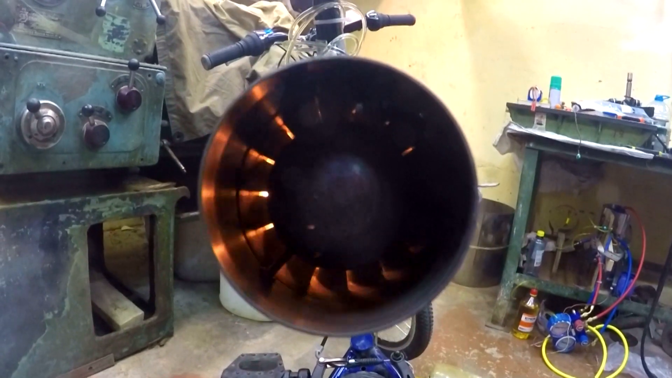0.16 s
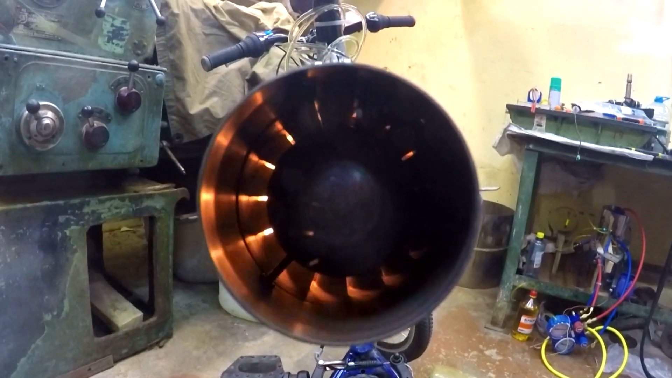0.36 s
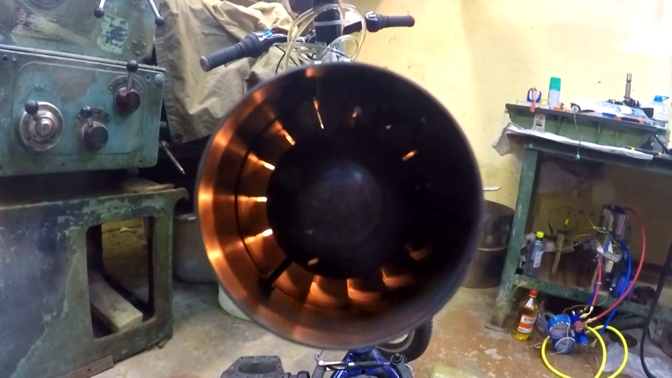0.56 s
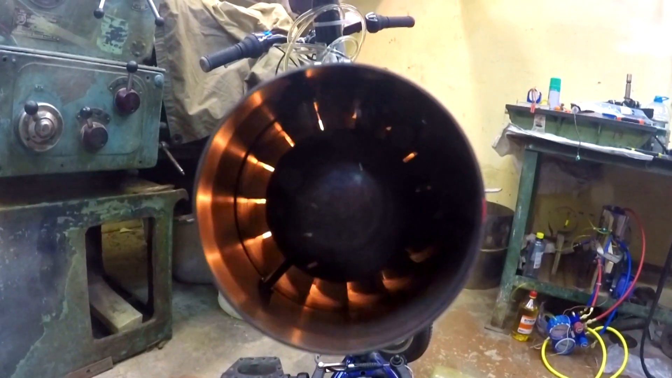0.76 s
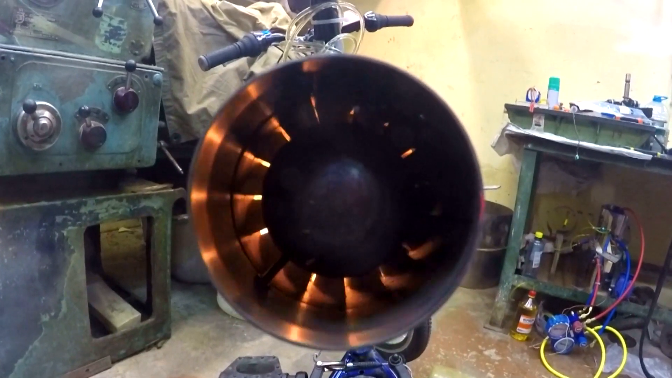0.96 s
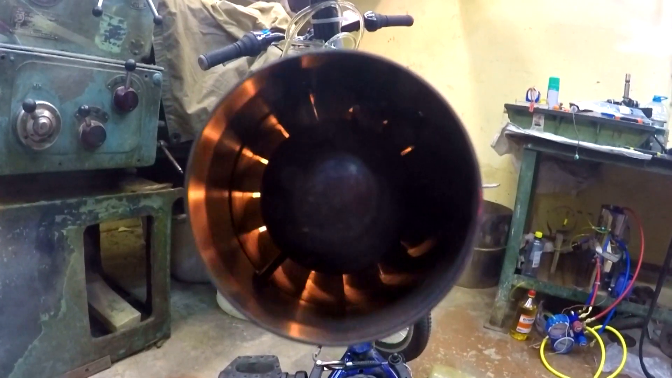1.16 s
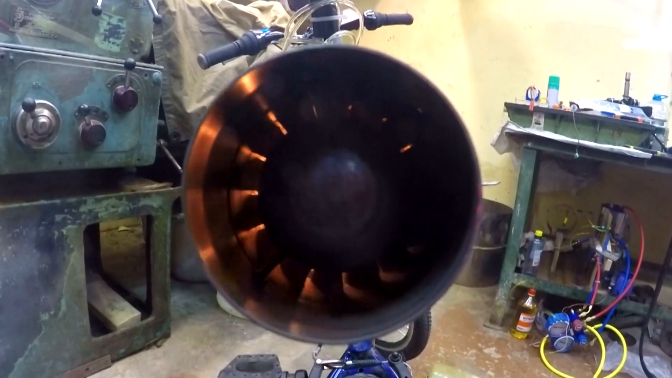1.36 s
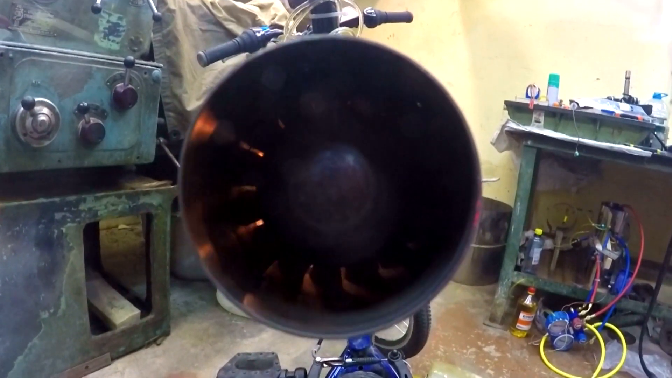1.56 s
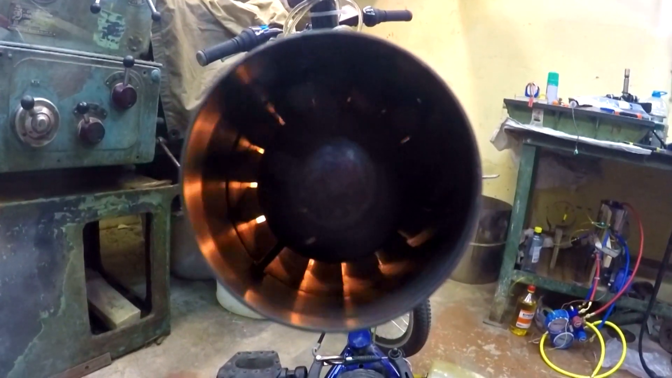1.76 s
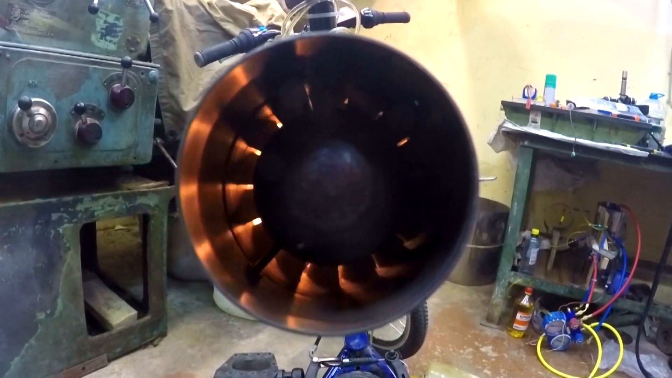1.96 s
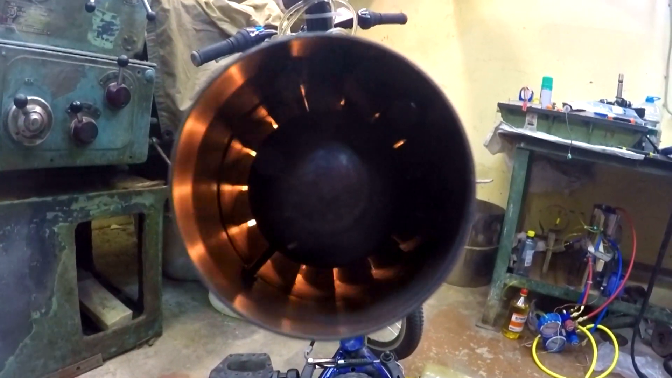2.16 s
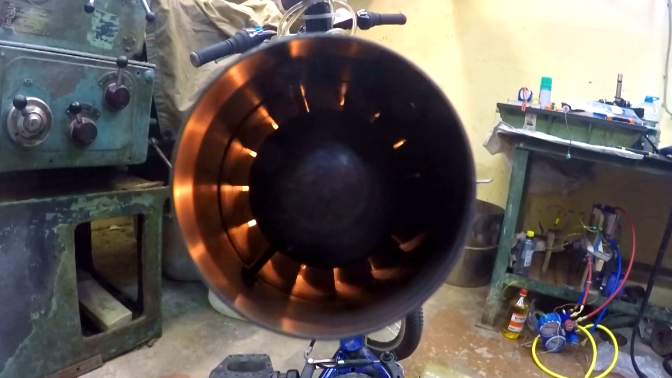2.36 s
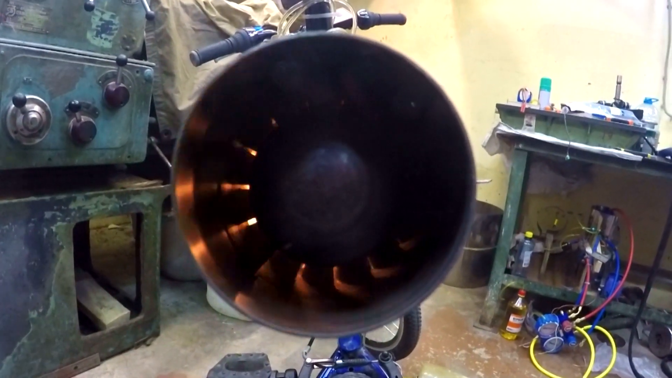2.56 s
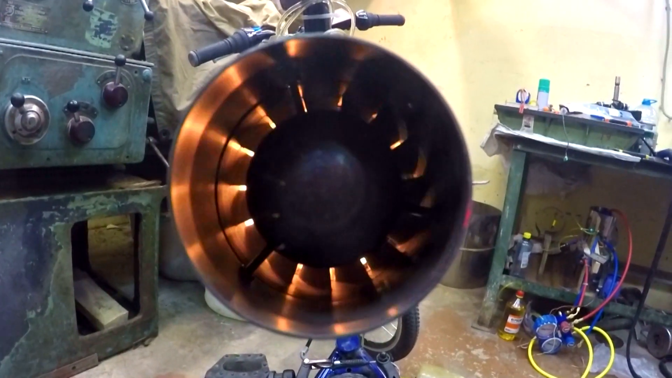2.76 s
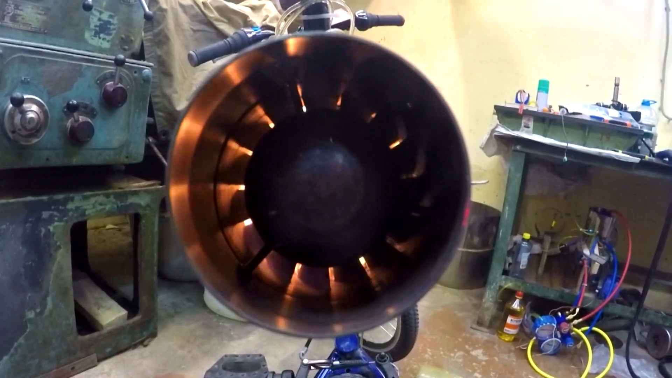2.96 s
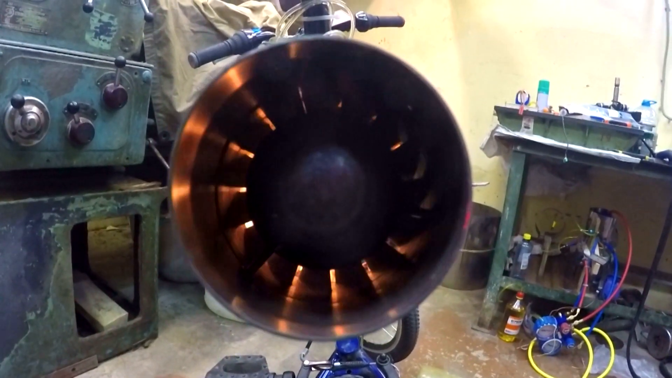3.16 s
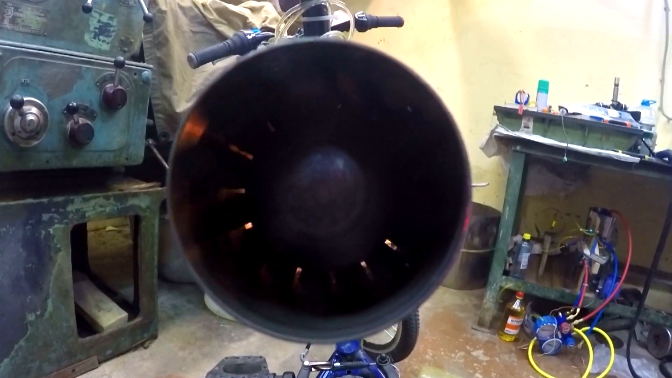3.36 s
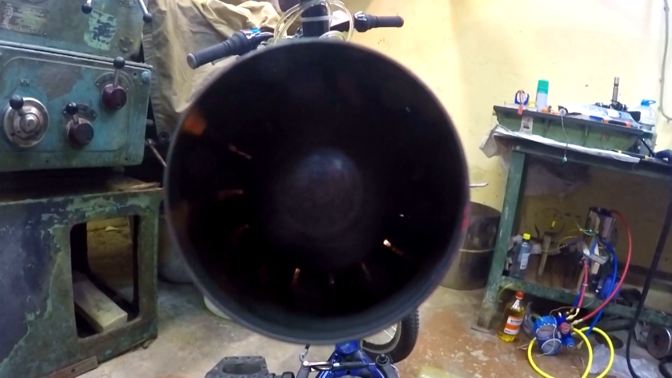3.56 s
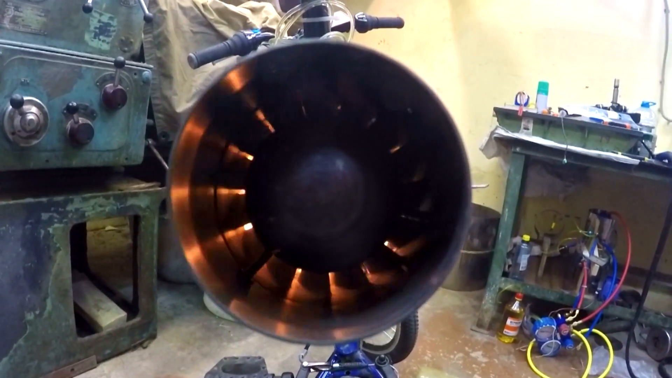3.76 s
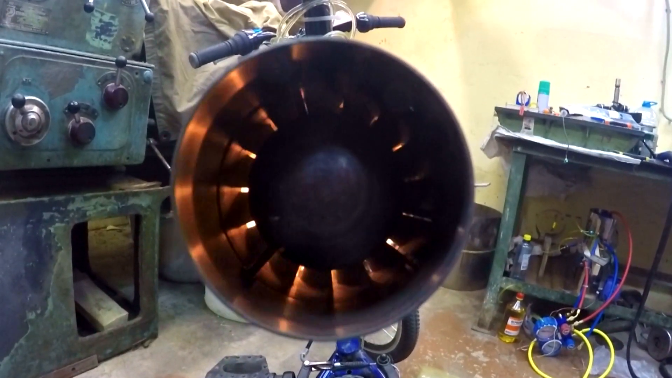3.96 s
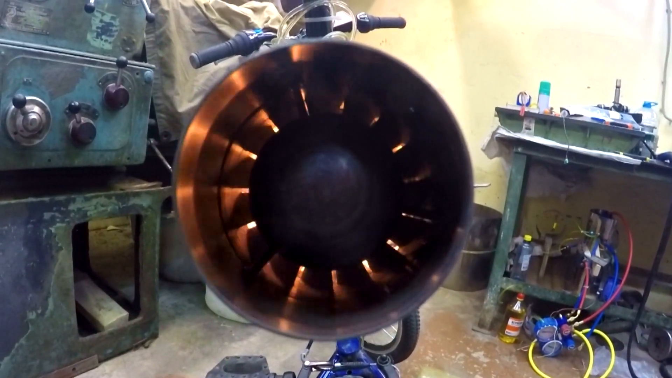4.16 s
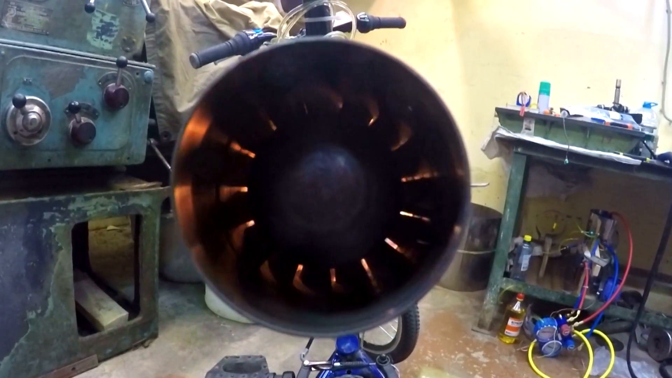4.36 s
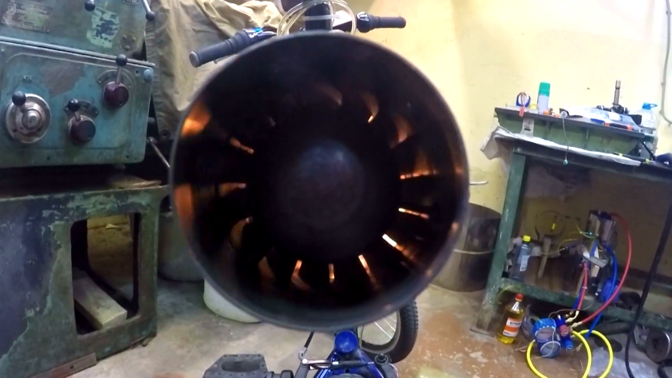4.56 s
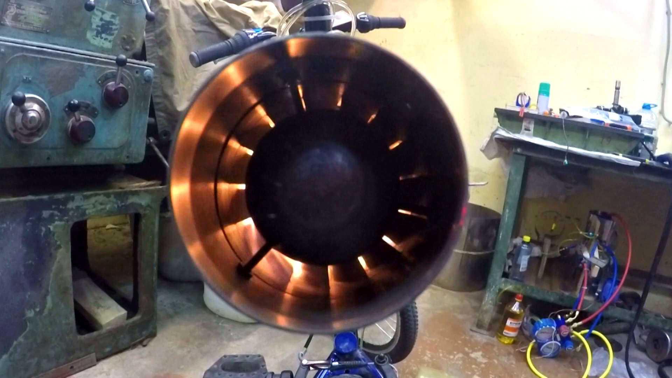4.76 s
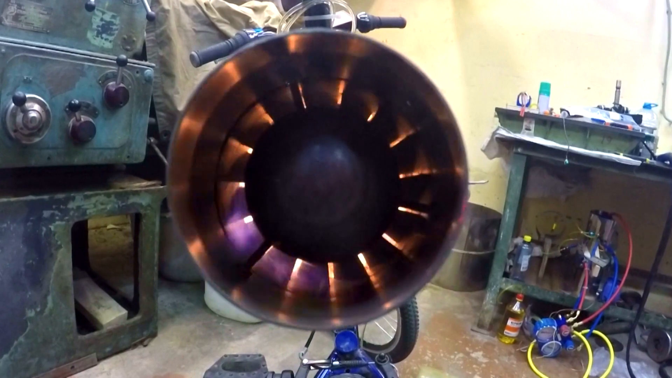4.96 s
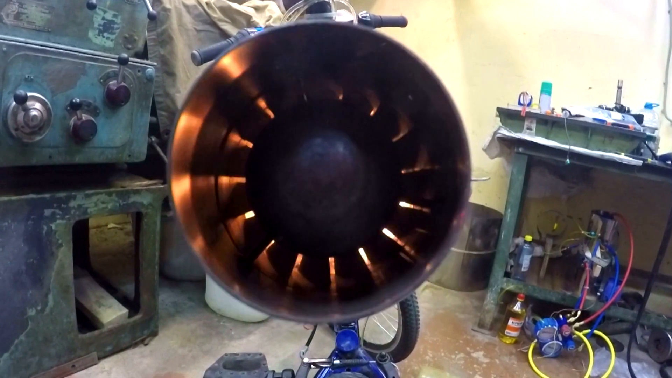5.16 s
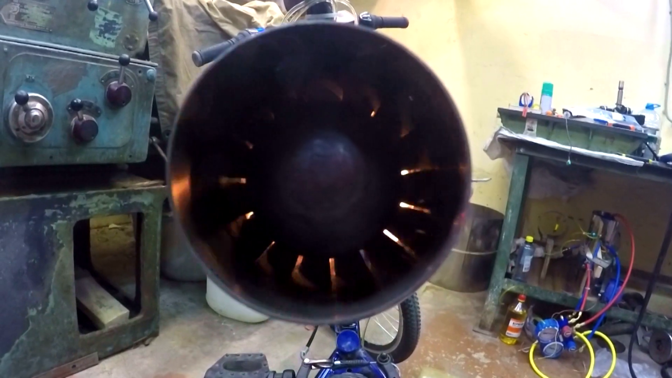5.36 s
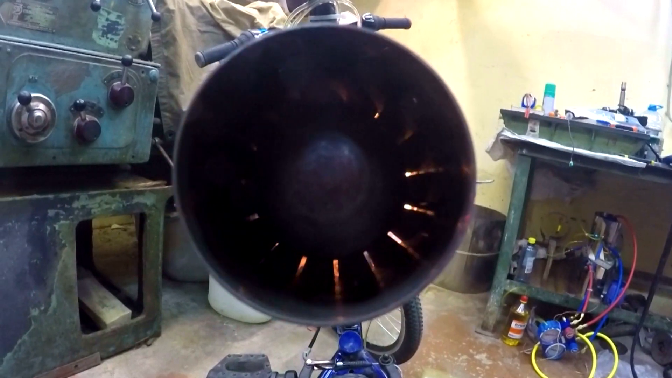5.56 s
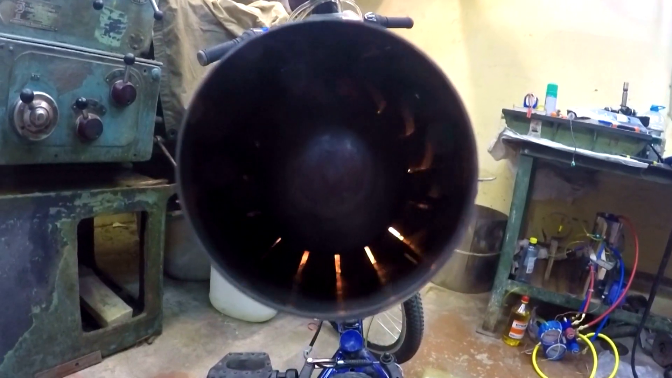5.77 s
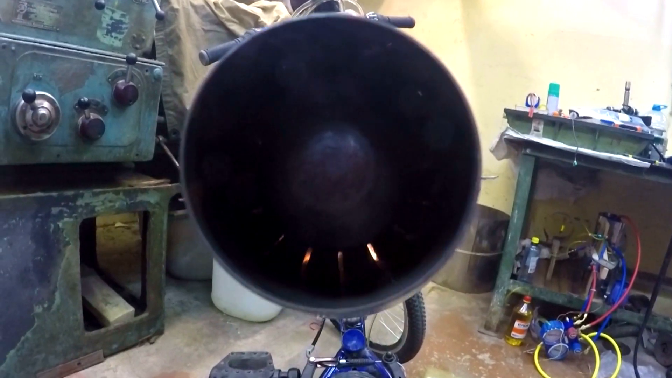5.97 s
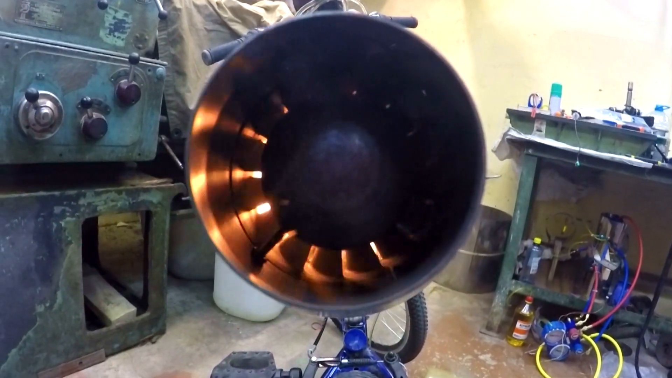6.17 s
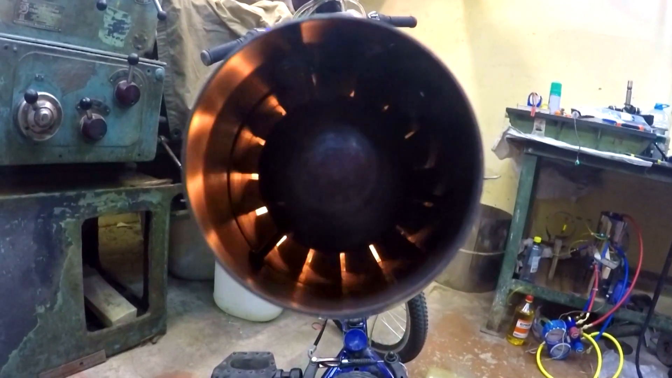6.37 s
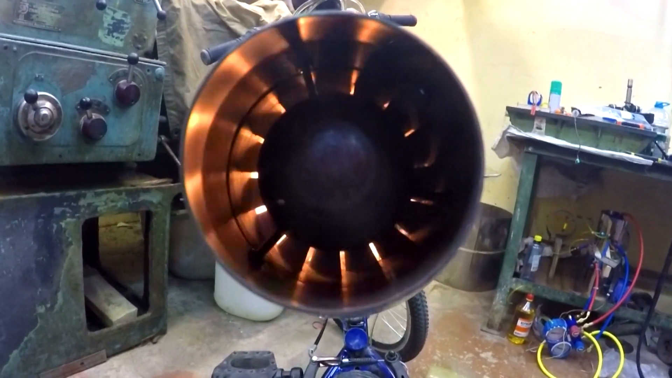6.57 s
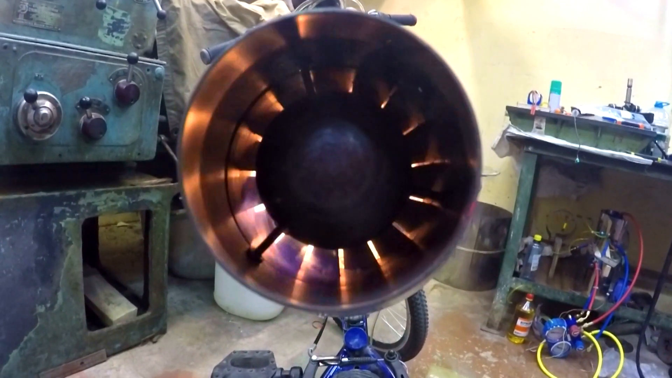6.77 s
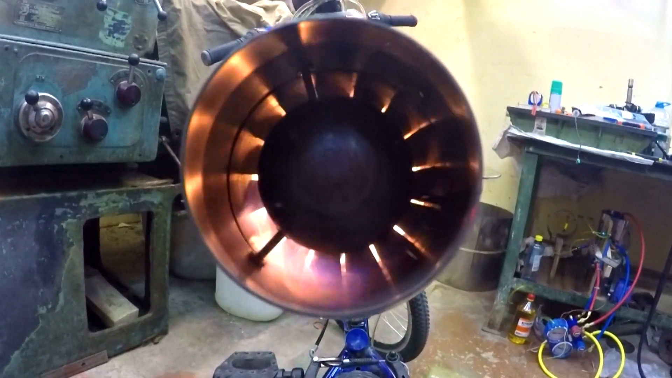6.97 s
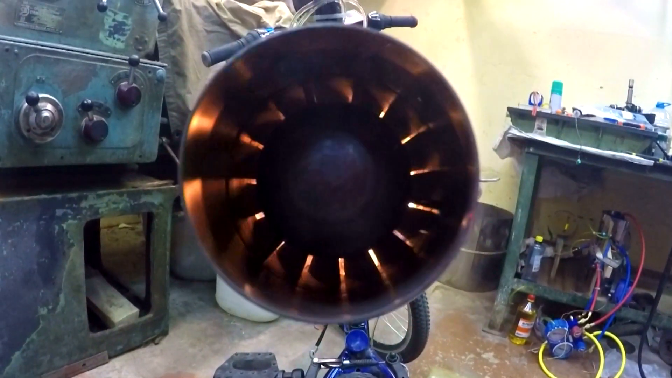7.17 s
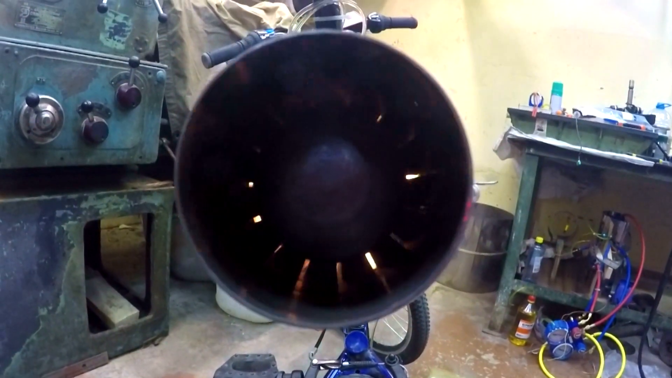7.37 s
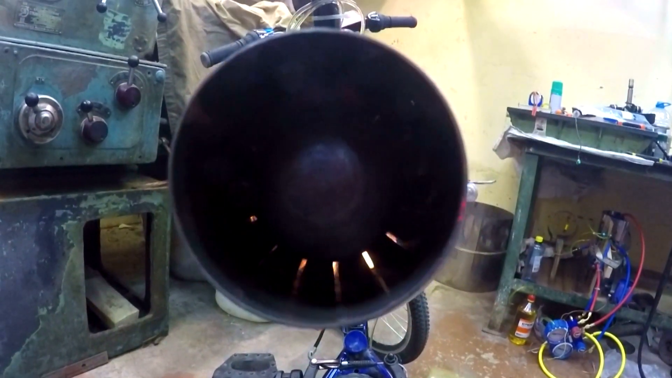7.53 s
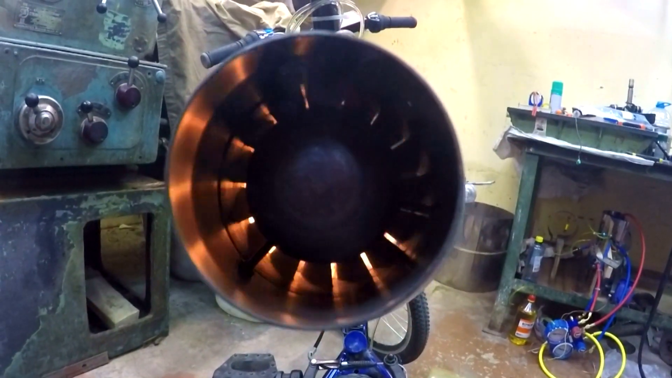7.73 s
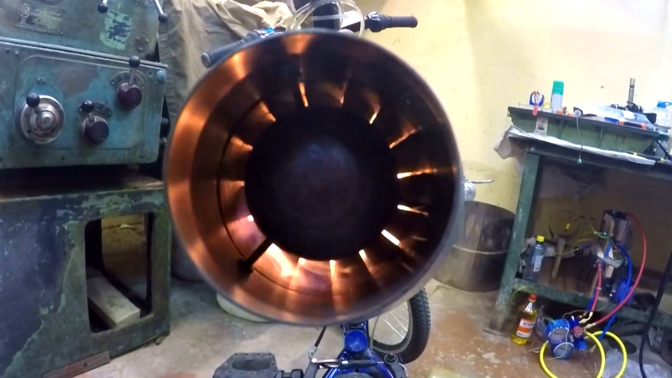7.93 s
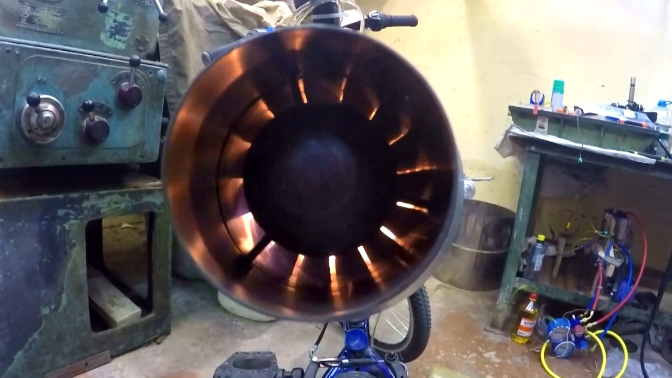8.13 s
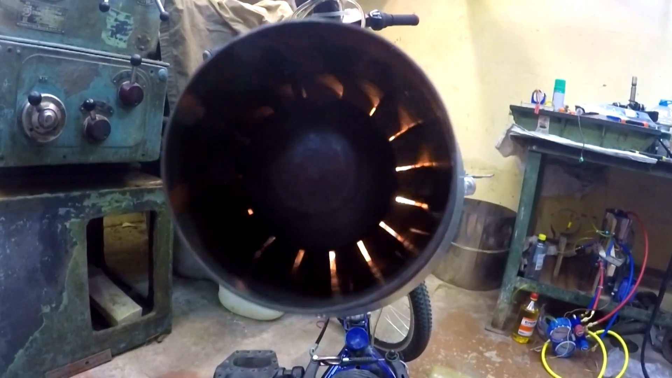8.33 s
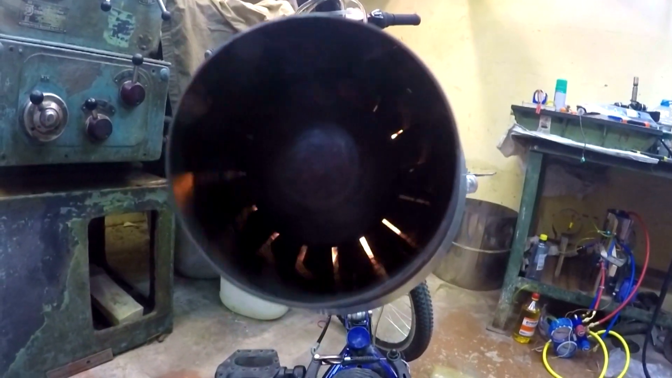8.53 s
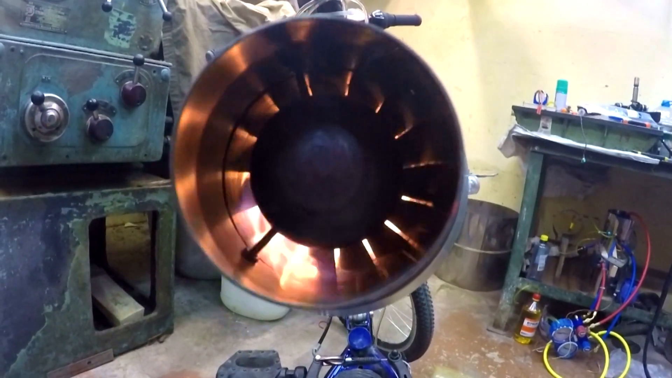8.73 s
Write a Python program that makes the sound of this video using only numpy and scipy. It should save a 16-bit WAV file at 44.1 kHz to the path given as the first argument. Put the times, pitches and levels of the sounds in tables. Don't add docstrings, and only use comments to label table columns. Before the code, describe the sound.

Low, fluttering combustion roar swells and drops in a tail pipe while a faint turbine whine rises and a fuel pump ticks steadily.

```python
import sys
import numpy as np
from scipy import signal
from scipy.fft import rfft, irfft, next_fast_len
from scipy.io import wavfile
from scipy.ndimage import uniform_filter1d, map_coordinates

SR = 44100
rng = np.random.default_rng(int(sys.argv[2]) if len(sys.argv) > 2 else 0)


def master_out(mix):
    frames = np.transpose(np.atleast_2d(mix))
    ceiling = np.clip(frames, -1, 1)
    pcm = np.round(ceiling * 32767).astype(np.int16)
    wavfile.write(sys.argv[1], SR, pcm)


def volts_from_db(level):
    exponent = np.asarray(level, float) / 20
    return 10 ** exponent


N = 388080

# f/Hz, width/Hz, level/dB
ROOM_MODES = [(81, 16, 2), (133, 58, -5.5), (176, 15, 5), (265, 13.5, 5), (283, 12, -2), (524, 8.4, -12),
              (739.4, 15, -22), (1008, 18, 8.5), (1180, 24, -17), (1530, 11, 8), (2300, 95, 5),
              (3770, 530, 2.5), (4960, 110, 7.5)]
# f/Hz, t/s
ECHO_TIME = [(200, 0.25), (2000, 0.97), (10000, 0.18)]

# t/s, f/Hz, level/dB
STARTER_TONE = [(0, 3775, -63), (.5, 3750, -56), (1, 3840, -80.5), (1.3, 3730, -64), (2.4, 3860, -67),
                (3.2, 3830, -88), (8.8, 3930, -94.5)]

FIRM_STROKES = [0, 1, 2, 3, 4, 7, 8, 9, 11, 16, 17, 20, 24, 27, 28, 29, 30, 34]
PUMP_START, PUMP_PERIOD = .135, .2212
FIRM_DB, SOFT_DB = 1, -4
# f/Hz, level/dB
PUMP_COLOUR = [(1200, -30), (2000, -1), (3300, 1), (5000, -6), (7500, -4), (10000, -8), (12000, -17),
               (15000, -26)]

# f/Hz, level/dB
HISS_COLOUR = [(1200, -19), (1700, -19), (2340, -5), (3060, -7.5), (3900, -5.5), (4420, -14), (5050, -9),
               (5680, -13), (7880, -20), (8770, -19.5), (10500, -24.5), (12100, -26.5), (14800, -27.5),
               (15400, -33)]
# f/Hz, level/dB
INTAKE_COLOUR = [(600, -23), (800, 8), (1050, 9.5), (1350, 10), (1500, 0.5), (1650, -38)]

# t/s, speed/(rev/s)
SHAFT_SPEED = [(0, 58.15), (.31, 60.85), (.63, 63.55), (.94, 65.84), (1.26, 67.84), (1.57, 69.45),
               (2.2, 72.23), (3.14, 75.99), (3.77, 77.07), (4.71, 79.49), (5.34, 81.65), (5.7, 82.1),
               (6.29, 81.79), (6.6, 82.37), (7.23, 85.04), (7.86, 84.75), (8.3, 85.85), (8.8, 85.55)]
BLADES = 60
# t/s, level/dB
BLADE_LEVEL = [(0, -47.5), (.5, -54), (1, -51), (1.4, -49.5), (2.2, -57), (2.7, -51), (3.3, -54.5),
               (3.85, -51), (4.4, -52.5), (4.85, -52.5), (5.3, -54), (5.6, -47.5), (6.2, -49),
               (6.65, -48.5), (6.8, -51.5), (7.15, -47.5), (7.8, -42), (7.9, -50), (8.6, -50.5), (8.8, -57)]
# t/s, half width/s
BLADE_DIPS = [(.13, .012), (.25, .015), (.31, .025), (.44, .015), (.56, .02), (.78, .015), (1.16, .03),
              (1.25, .04), (1.44, .04), (1.85, .05), (2.07, .03), (2.57, .04), (2.81, .03), (2.96, .04),
              (3.75, .05), (4.14, .04), (4.35, .04), (4.62, .05), (4.71, .03), (5.04, .06), (5.16, .04),
              (5.73, .12), (6.51, .03), (6.74, .03), (6.91, .025), (7.0, .05), (8.17, .05), (8.33, .03),
              (8.48, .06), (8.71, .05)]
ROW_ORDERS = [30, 46, 47, 48, 72, 90]
# t/s, half width/s, level/dB
ROW_SWELLS = [
    [(.95, .4, -61), (1.82, 0.1, -65), (3, 0.2, -56.5), (3.61, 0.21, -52.5), (4.54, 0.18, -59),
     (6.05, 0.48, -53.5), (7.6, .25, -57.5), (8.37, .2, -64)],
    [(1.63, 0.3, -67), (2.67, .2, -66), (4.5, 0.41, -59), (5.5, 0.18, -56), (6.75, 0.44, -60.5),
     (8.05, 0.31, -55.5), (8.79, 0.11, -53.5)],
    [(4.25, 0.34, -62), (5.3, .4, -60), (6.45, 0.24, -55), (8.07, 0.25, -64)],
    [(3.1, .4, -62), (4.3, 0.37, -59), (5.36, 0.29, -54), (6.15, 0.3, -51), (6.8, .3, -60),
     (7.4, 0.21, -60), (8.7, 0.35, -64)],
    [(5, .25, -68), (5.55, 0.19, -65), (6.3, 0.31, -66.5)],
    [(.2, .55, -63)],
]
ROW_REST_DB = -74.5
BALLS, CAGE_TURNS = 10, .4243
# f/Hz, level/dB
BEARING_COLOUR = [(2500, -25), (4000, -7), (5500, -1), (7000, -4), (9000, 1), (10500, -1), (12000, -9),
                  (13500, -10), (15500, -20)]

# t/s, rise/s, hold/s, extra burn/dB
FUEL_SURGES = [(0.247, 0.21, 0.83, 1.5), (1.756, 0.18, 0.44, 5.5), (2.655, 0.084, 0.32, 8),
               (3.621, 0.45, 0.072, 11), (4.591, 0.081, 0.42, 11), (5.369, 0.061, 0.32, 6.5),
               (6.189, 0.22, 0.73, 10), (6.593, 0.35, 0.03, 7), (7.762, 0.017, 0.42, 10),
               (7.846, 0.21, 0.056, 4.5), (8.581, 0.13, .2, 14)]
COOLING_DB_PER_S, FULL_DB, IDLE_DB, IDLE_DB_PER_REV = 25, 7, -23.5, 0.1335
# t/s, roar level/dB, lick level/dB
FLARES = [(.12, 2.5, 2), (.19, -7.5, 0.5), (.32, 4.5, -0.5), (.4, -4, -3), (.54, 1, -3), (.86, -3.5, -4.5),
          (.97, 3, 9), (1.08, 0, -5.5), (1.192, 5.5, -4), (1.37, -2, -6), (1.45, 0, -11.5), (1.89, 0, -3.7),
          (1.97, -4.5, -6.7), (2.13, 0.5, 8.5), (2.21, -4, 2), (2.361, -0.5, 14.5), (2.95, -0.3, 9.5),
          (3.11, 0.5, -0.8), (3.48, 3, 3), (3.72, 1.5, .1), (3.95, -1.5, -3.3), (4.171, -2, 9),
          (4.46, 2.5, -0.5), (4.98, 3.5, 6), (5.41, 1, -5), (5.55, -2, 6.5), (5.61, 2.5, 0), (6.3, 2, 8),
          (6.38, -4, -10.5), (7.8, 0.5, -6.2)]
FLARE_S, LICK_S = .038, .012
# f/Hz, level/dB per Hz
ROAR_COLOUR = [(90, -39.5), (150, -11.5), (260, -5.5), (400, -4), (480, -8.5), (600, -12), (690, -11),
               (780, -16), (950, -28), (1350, -38.5), (1600, -36.5), (2300, -62.5), (3000, -81.5)]
# f/Hz, share of the heat
HEAT_SHARE = [(300, 0.81), (450, 0.58), (650, 1), (1000, 0.99), (1400, 0), (2200, 1)]
# f/Hz, level/dB
RUMBLE_COLOUR = [(12, -32), (20, -8.5), (70, -2.5), (118, -3), (150, 1), (200, -27), (330, -120)]
# f/Hz, level/dB
TORCH_COLOUR = [(1200, -47.5), (1450, 5.5), (1650, 8.5), (1950, 5), (2300, -2), (2800, -3), (4500, -52)]
COLD_HZ, NOTE_HZ_PER_DB = 342.8, 9
HEAT_PER_DB, TORCH_PER_DB, RUMBLE_PER_DB = 0.5, 1.03, 0.33
DUCK_PER_DB, DULL_PER_DB = 0.13, .5
DULL_FROM_DB = 5.5


def unit(x):
    return x / np.sqrt(np.mean(x ** 2) + 1e-20)


def along(points, hz):
    f, v = np.transpose(points)
    return np.interp(np.log(hz + 1), np.log(f + 1), v)


def curves(rows, t=None):
    s, *cols = np.transpose(rows)
    if t is None:
        t = np.arange(N) / SR
    return [np.interp(t, s, c) for c in cols]


def wobble(rate):
    knots = rng.standard_normal(int(N * rate / SR) + 4)
    return map_coordinates(knots, [np.arange(N) * rate / SR])


def fading(rate, depth):
    return 1 + depth * (wobble(rate) + 1j * wobble(rate))


def filtered(x, response):
    m = next_fast_len(N + SR // 2)
    hz = np.fft.rfftfreq(m, 1 / SR)
    return irfft(rfft(x, m) * response(hz), m)[..., :N]


def rush(shape_db, patchy_db):
    hz, t, z = signal.stft(rng.standard_normal(N), SR, nperseg=2048)
    gain = volts_from_db(shape_db(hz[:, None], t) + 0 * t)
    gain = gain / np.sqrt(np.mean(gain ** 2, axis=0))
    field = uniform_filter1d(rng.standard_normal(z.shape), size=8, axis=0)
    field = uniform_filter1d(field, size=4, axis=1)
    z = z * gain * volts_from_db(patchy_db * unit(field))
    return unit(signal.istft(z, SR, nperseg=2048)[1][:N])


def periodic(turns, harmonics):
    size = 2 ** 13
    phases = np.exp(2j * np.pi * rng.random(len(harmonics)))
    wave = irfft(harmonics * phases, size)
    return unit(np.interp(turns % 1 * size, np.arange(size), wave, period=size))


def burning():
    t = np.arange(0, N / SR + .01, .005)
    burn = 0
    for start, rise, hold, db in FUEL_SURGES:
        heating = db * (t - start) / rise
        cooling = db - COOLING_DB_PER_S * (t - start - rise - hold)
        burn = burn + np.clip(np.minimum(heating, cooling), 0, db)
    s, flare_db, lick_db = np.transpose(FLARES)

    def bell(width):
        return np.exp(-((t[:, None] - s) / width) ** 2)

    idle_db = IDLE_DB + IDLE_DB_PER_REV * (curves(SHAFT_SPEED, t)[0] - 80)
    roar_db = idle_db + FULL_DB * np.tanh(burn / FULL_DB) + bell(FLARE_S) @ flare_db
    return np.transpose([t, burn, roar_db, bell(LICK_S) @ lick_db])


def workshop(x):
    hz, t, z = signal.stft(rng.standard_normal(SR // 2), SR, nperseg=256)
    fall_db = -60 * t / along(ECHO_TIME, hz)[:, None]
    tail = signal.istft(z * volts_from_db(fall_db), SR, nperseg=256)[1]
    return signal.fftconvolve(x, tail / np.linalg.norm(tail))[:N]


def starter():
    hz, db = curves(STARTER_TONE)
    level = volts_from_db(db + 1.1 * wobble(11))
    return level * np.sqrt(2) * np.sin(2 * np.pi * np.cumsum(hz) / SR)


def pump():
    times = PUMP_START + PUMP_PERIOD * np.arange(int(N / SR / PUMP_PERIOD))
    firm = np.isin(np.arange(len(times)), FIRM_STROKES)
    stroke_db = np.where(firm, FIRM_DB, SOFT_DB) + 1.6 * rng.standard_normal(len(times))
    strokes = np.zeros(N)
    strokes[(times * SR).astype(int)] = volts_from_db(stroke_db)
    t = np.arange(SR // 10) / SR

    def puff(delay):
        return np.clip(t - delay, 0, None) / .008 * np.exp(-np.abs(t - delay) / .008)

    swell = signal.fftconvolve(strokes, puff(0) + 0.54 * puff(0.059))[:N]
    return volts_from_db(-47.5) * swell * rush(lambda hz, t: along(PUMP_COLOUR, hz), patchy_db=0)


def air():
    fire = burning()

    def shape(hz, t):
        hot_db = np.clip(curves(fire, t)[0] - DULL_FROM_DB, 0, None)
        tilt_db = -DULL_PER_DB * uniform_filter1d(hot_db, size=5)
        treble_db = np.clip((hz - 7000) / 5000, 0, 1.5) * (tilt_db - np.mean(tilt_db))
        speed_db = (hz < 3400) * 0.3 * (curves(SHAFT_SPEED, t)[0] - 76)
        return along(HISS_COLOUR, hz) + treble_db + speed_db

    noise = rush(shape, patchy_db=2.5)
    top = filtered(noise, lambda hz: hz > 8000)
    top_rms = np.sqrt(np.abs(uniform_filter1d(top ** 2, size=SR // 4)))
    hiss_db = -66.0 - DUCK_PER_DB * curves(fire)[0] + 0.29 * wobble(7.7)
    hiss = volts_from_db(hiss_db) * noise / top_rms
    speed, = curves(SHAFT_SPEED)
    drone_db = -47.0 + 0.24 * (speed - 74.5) + 2.5 * wobble(5)
    drone = volts_from_db(drone_db) * rush(lambda hz, t: along(INTAKE_COLOUR, hz), patchy_db=0.0)
    return hiss + drone


def blade_rows(tone):
    t = np.arange(0, N / SR + .01, .002)
    dips = np.prod([np.tanh((t - s) / w) for s, w in BLADE_DIPS], axis=0)
    blade = curves(np.transpose([t, dips]))[0] * volts_from_db(curves(BLADE_LEVEL)[0])
    whine = blade * volts_from_db(.6) * tone(BLADES, fading(34, .36))
    for order, swells in zip(ROW_ORDERS, ROW_SWELLS):
        size = volts_from_db(ROW_REST_DB) + sum(volts_from_db(db) * np.exp(-((t - s) / w) ** 2) for s, w, db in swells)
        whine += volts_from_db(-1.5) * curves(np.transpose([t, size]))[0] * tone(order, fading(24, .3))
    return whine


def bearing(speed, turns):
    k = np.arange(620)
    buzz_db = 3.9 * rng.standard_normal(len(k)) + 4.5 * (k % 2 == 0)
    buzz = periodic(turns, volts_from_db(buzz_db) * (k < 3 * BLADES))
    beside = np.isin(k % BALLS, (1, BALLS - 1))
    balls = volts_from_db(2.2 * rng.standard_normal(len(k))) * ((k % BALLS == 0) + .55 * beside)
    cage = np.cumsum(CAGE_TURNS * speed * (1 + .0007 * wobble(5))) / SR
    sing = volts_from_db(-63.8) * periodic(cage, balls) + volts_from_db(-74) * buzz
    return filtered(sing, lambda hz: volts_from_db(along(BEARING_COLOUR, hz) + 6))


def rotor():
    speed, = curves(SHAFT_SPEED)
    turns = np.cumsum(speed * (1 + 0.00044 * wobble(30))) / SR

    def tone(order, gain):
        return np.sqrt(2) * np.imag(gain * np.exp(2j * np.pi * order * turns))

    frame = 1 / (1 + ((speed - 81.9) / .5) ** 2)
    unbalance_db = -47 + 10.5 * frame - 1.4 * curves(burning())[0]
    unbalance = volts_from_db(unbalance_db) * tone(1.0, fading(2.4, .25))
    return blade_rows(tone), bearing(speed, turns), unbalance


def flame():
    fire = burning()

    def shape(hz, t):
        burn, _, lick_db = curves(fire, t)
        gas = uniform_filter1d(np.minimum(burn, 11), size=9)
        note_hz = COLD_HZ + NOTE_HZ_PER_DB * gas
        pipe_db = 11 / (1 + ((hz - note_hz) / 60) ** 2)
        heat_db = HEAT_PER_DB * (burn - 5) + 0.69 * lick_db
        return along(ROAR_COLOUR, hz) + pipe_db + along(HEAT_SHARE, hz) * heat_db

    burn, roar_db, lick_db = curves(fire)
    flicker = wobble(16)
    roar = volts_from_db(roar_db - .4 + .7 * flicker) * rush(shape, patchy_db=.7)
    rumble_db = -37.5 + 0.47 * (roar_db + 23) + RUMBLE_PER_DB * burn
    rumble_db = rumble_db + 1.2 * flicker + .7 * wobble(6)
    rumble = volts_from_db(rumble_db) * rush(lambda hz, t: along(RUMBLE_COLOUR, hz), patchy_db=-1.5)
    torch_db = -61.5 + TORCH_PER_DB * burn + lick_db + .2 * (roar_db + 14)
    torch_db = torch_db + 1.0 * flicker + 0.6 * wobble(12)
    torch = volts_from_db(torch_db) * rush(lambda hz, t: along(TORCH_COLOUR, hz), patchy_db=1.8)
    return roar + rumble + torch


def scene():
    whine, sing, unbalance = rotor()
    near = flame() + air() + pump() + unbalance
    duck_db = -DUCK_PER_DB * curves(burning())[0]
    sing = sing * volts_from_db(duck_db - np.mean(duck_db))
    heard = near + volts_from_db(-6) * sing + workshop(sing + volts_from_db(-15) * near)

    def standing(hz):
        return volts_from_db(sum(db / (1 + (2 * (hz - c) / w) ** 2) for c, w, db in ROOM_MODES))

    return (filtered(heard, standing) + whine + starter())[None]


def top_cut(x):
    return signal.sosfilt(signal.butter(12, 15200, fs=SR, output="sos"), x)


def record(dry):
    closing = np.clip(np.arange(N)[::-1] / (.002 * SR), .4, 1)
    return top_cut(dry * closing)


dry = scene()
out = record(dry)
master_out(out)
```